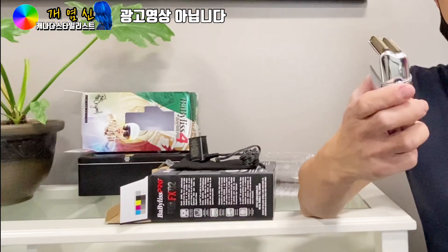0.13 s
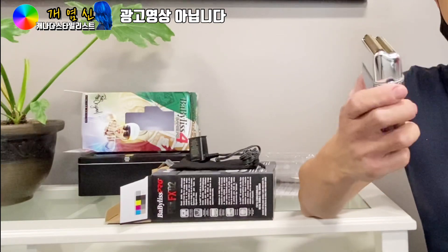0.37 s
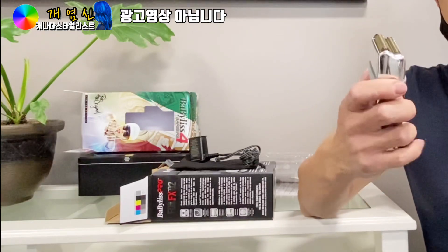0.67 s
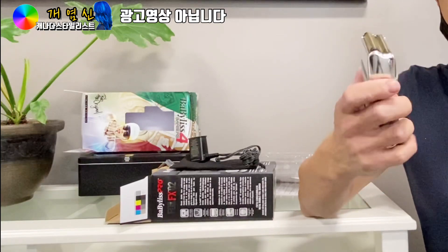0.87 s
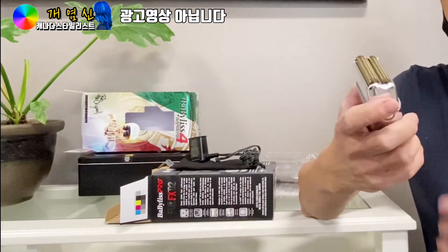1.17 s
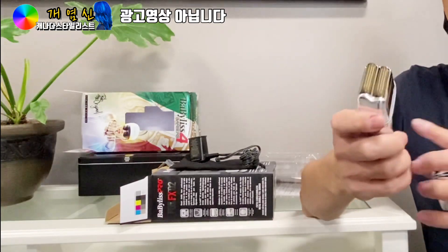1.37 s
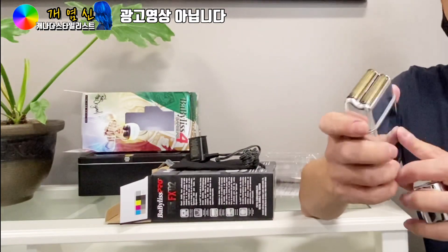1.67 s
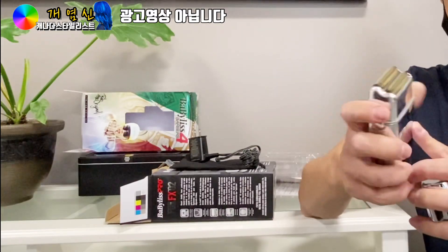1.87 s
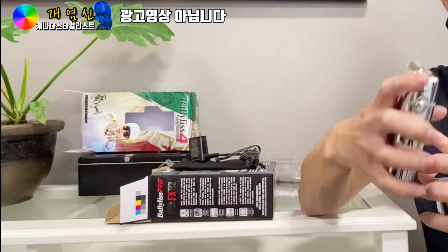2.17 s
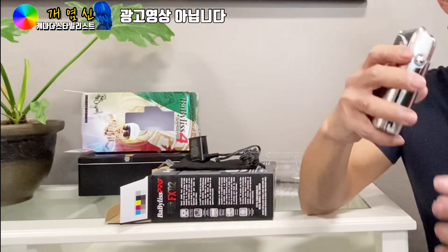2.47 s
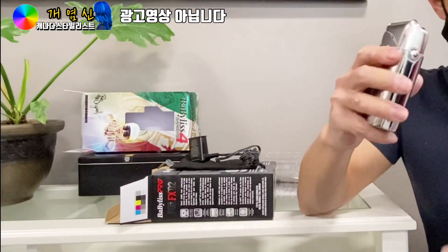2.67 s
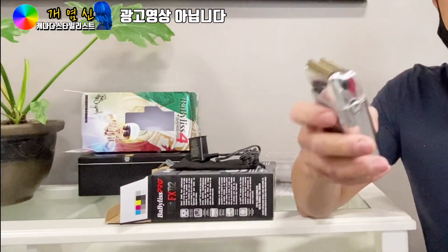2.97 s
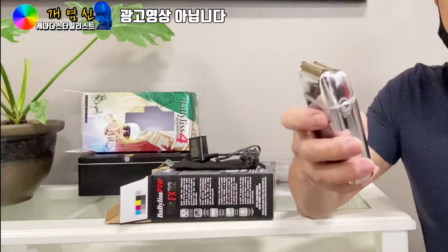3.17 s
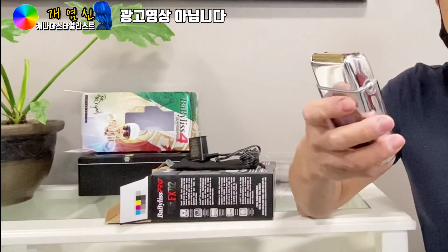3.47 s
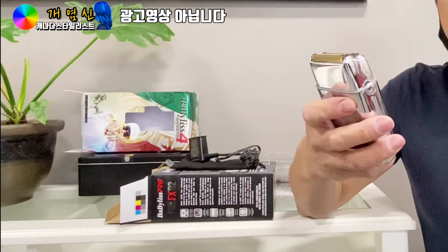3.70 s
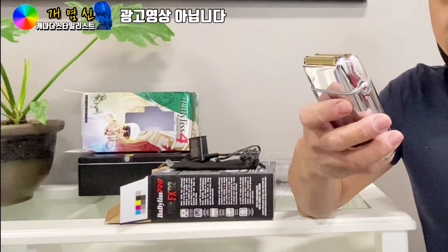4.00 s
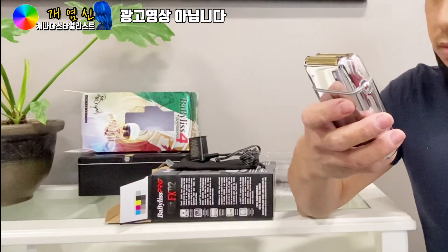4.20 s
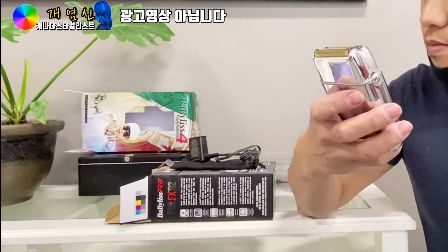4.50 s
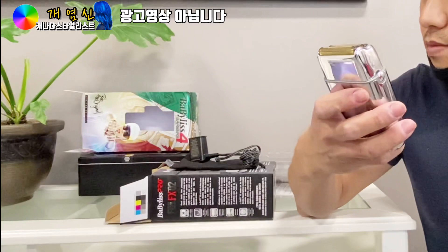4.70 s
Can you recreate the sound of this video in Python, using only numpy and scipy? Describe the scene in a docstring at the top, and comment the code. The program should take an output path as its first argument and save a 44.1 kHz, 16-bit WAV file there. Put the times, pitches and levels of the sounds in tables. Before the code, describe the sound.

The tail of a shaver's buzz slides down and ends right away. A near-silent pause of over a second follows, with faint handling ticks, one medium click, light cloth rustle and a sharp crisp click. The motor switches on with a quick rising rasp, then holds a steady, nasal buzz until the end. Close, clean pickup indoors, with a short soft room tail and low background rumble.

```python
"""Cordless foil shaver in a quiet room

A motor runs down and falls silent. The case gives two clear clicks among fainter ones, then the
motor spins up and buzzes evenly while the hand turns it. The buzz sums the multiples of the turn rate,
shaped by shell resonances, with a pulsing noise rasp. Clicks are noise crackles ringing the case modes.
Noise rumble, mains hum, air and sleeve rustle lie below; decaying noise makes the room."""
import sys
import numpy as np
from scipy import signal
from scipy.fft import rfft, irfft
from scipy.io import wavfile
from scipy.ndimage import uniform_filter1d

SR = 44100
rng = np.random.default_rng(int(sys.argv[2]) if len(sys.argv) > 2 else 0)


def digitize_waveform(pressure):
    """Quantize a signal to 16-bit integers and store it at the path in sys.argv[1].

    Rows of a 2-D input are taken as channels; values are limited to [-1, 1].
    """
    field = np.atleast_2d(pressure).T
    bounded = np.clip(field, -1, 1)
    quanta = np.round(bounded * 32767).astype(np.int16)
    wavfile.write(sys.argv[1], SR, quanta)


N = 213752  # samples
STEP = 128  # samples between points of the slow controls
CUTOFF_HZ = 16000

# Motor switched on. Each row: time in seconds, full speed in turns per second, buzz level in dB at full speed.
RUNNING = [(1.562, 137.4, -36.5), (1.8, 137.0, -33), (1.97, 136.7, -32), (2.08, 135.9, -34),
           (2.47, 136.2, -34.5), (3.44, 136.5, -34.5), (4.07, 135.8, -34), (4.85, 135.5, -33.5)]
FULL_SPEED_HZ = 136
LOUDNESS_POWER = 1.37  # gain goes as speed to this power
# The speed lags at switch-on, then the lag closes.
SPIN_UP_LAG_HZ, SPIN_UP_S, SPIN_UP_SHAPE, ENGAGE_S = 48.6, 0.053, 1.45, 0.014
# Switched off, friction slows the free motor evenly; STOP_S is where its sound ends.
COAST_HZ, BRAKING_HZ_PER_S, COAST_DB, STOP_S = 134.2, 1100, -33, 0.078
COAST_POSE = 0.37  # 0 facing, 1 aside
COAST_DULL_DB = 9  # per octave about 1500 Hz, at standstill: slow knocks are soft

# Cutter reversals and bounces within a turn. Each row: moment as a share of a turn, level in dB.
KNOCKS = [(0.048, -6), (0.332, -7), (.52, -6), (.83, -4.5)]
KNOCK_LENGTH = 0.12  # decay, as a share of a turn
KNOCK_SPREAD, KNOCK_SPREAD_HZ = 0.029, 110  # no two knocks are equally hard: share, and bandwidth

# Turns of the hand from hold to hold (facing, aside, away).
# Each row: middle in seconds, length in seconds, treble flash in dB as the foil sweeps past.
TURNS = [(2.137, 0.4, 3), (2.722, 0.15, -0.5)]
# Shell and foil resonances in the buzz.
# Each row: centre in Hz, width in Hz, then relative level in dB facing, aside and away.
SHELL = [(527, 140, -20.5, -12, -22), (685, 170, -19, -4.5, -10), (803, 120, -21, -4.5, -8),
         (931, 104, -12.5, -29, -13.5), (1080, 130, -10, -8.5, -38), (1236, 77, -2.5, -1, -4.5),
         (1434, 220, -13.5, -5.5, -14.5), (1620, 120, -9, -4, -24), (1820, 123, 5, 0.5, -1),
         (1985, 155, 1.5, 2.5, 3.5), (2213, 45, 2, 3, -62), (2384, 132, -4.5, 3, -5.5),
         (2707, 56, -8.5, 1.5, -11.5), (3030, 110, -9, -13, -24), (3430, 450, -19, -20, -15.5),
         (4120, 900, -7.5, -11, -14.5), (5140, 520, -22, -14, -21.5), (5970, 290, -29, -4, -8),
         (6900, 1130, -14.5, -5, -18), (8430, 4400, -10, -8, -18.5)]
SHELL_FLOOR_DB, LOW_CUT_HZ = -28, 420
# Colour of the upper multiples. Each row: frequency in Hz, relative level in dB.
TREBLE = [(9100, -19.5), (10000, -20.5), (10800, -23.5), (12000, -21.5), (13000, -27.5), (14000, -31.5),
          (15500, -24)]
# Lift of that treble in dB: facing, aside, away.
TREBLE_LIFT_DB = [4, 6.5, 0]
# Both strokes of a turn sound alike, so odd upper multiples are weaker. Cut in dB: facing, aside, away.
ODD_DB = [-7, -3, -3]

# Reflections off hand and table add to or cancel the upper multiples, with a fresh draw for each hold.
SCATTER_SHARE, SCATTER_FROM_HZ, SCATTER_FULL_HZ = 0.24, 2600, 3600
PATCH_SHARE, PATCH_RATE = 0.33, 3.9  # drift in patches of neighbouring multiples: share, rate in Hz
# Level wander in dB at STEADY_BELOW_HZ, smaller below: while held, and added in a turn.
UNSTEADY_DB, TURNING_DB, STEADY_BELOW_HZ = 1.09, 0.83, 4000
WAVER_RATE, TREMOR_RATE = 4.4, 25  # slow and fast wander, Hz
TREMOR_SHARE, SPEED_JITTER = 0.53, 0.000996  # fast wander against the slow; share of the speed

# Colour of the cutters' rasp. Each row: frequency in Hz, relative density in dB per Hz.
RASP = [(400, -73), (700, -17.5), (1000, -7), (1250, -13), (1600, -8.5), (2000, -8), (2700, -11.5),
        (4200, -10), (5400, -15.5), (7000, -8), (12000, -17), (15800, -24)]
RASP_PULSING = 0.44
RASP_DB, RASP_TURNING_DB, COAST_RASP_DB = -22, 5, -6.5  # against buzz: at speed, added in a turn, coasting
START_RASP_DB, START_RASP_S = 10, 0.14  # added while the cutters rattle loosely, until the motor settles

# Clicks of the case. Each row: start in seconds, peak level in dB, brightness in dB per 5 kHz.
CLICKS = [(0.304, -53, -14), (0.5517, -29.5, 1), (0.789, -54, -12), (.904, -55, -3), (1.3688, -21, 9.5),
          (1.3734, -33.5, 2), (1.5633, -35.5, -10)]
# Ringing modes of the case. Each row: frequency in Hz, level in dB before brightness, 60 dB decay in seconds.
CASE = [(1230, -17.5, 0.0076), (2150, -2.5, 0.0067), (3510, -13, 0.0062), (4200, -8, 0.0054),
        (6160, -16, 0.0014), (7200, -3, 0.0023), (8740, -1.5, 0.0018), (9900, -12, 0.0018)]
CLICK_LENGTH_S, CLICK_LOW_HZ = 0.0012, 1000  # crackle decay; low cut
CRACK_DB = 7  # bare contact against the ringing, before brightness

ROOM_T60_S, ROOM_DB, ROOM_BUILD_S = 0.44, -6.5, 0.0054
CLICK_ROOM_DB, BUZZ_ROOM_DB = -2, -5  # sends into the room
# Colour of the room tail. Each row: frequency in Hz, relative level in dB.
ROOM_COLOUR = [(300, 13.5), (1000, 1), (2500, 1.5), (5000, 4), (10000, -7), (16000, 0)]

# Colour of the ventilation rumble. Each row: frequency in Hz, relative density in dB per Hz.
RUMBLE = [(0.88, -54), (1.5, 8.5), (16, 0.5), (38, -20), (70, -5), (81, -23), (98, -25), (132, -22.5),
          (173, -33), (205, -32.5), (232, -30.5), (296, -33), (397, -30.5), (438, -46), (520, -45),
          (680, -97), (1140, -120)]
RUMBLE_DB = -35
# Steady mains hum. Each row: frequency in Hz, rms level in dB.
MAINS = [(62, -52), (120, -66), (240, -63.5), (360, -68.5), (480, -69.5)]
# Colour of the room air. Each row: frequency in Hz, relative density in dB per Hz.
AIR = [(260, -17), (450, 5), (653, -3), (683, 1), (948, -6.5), (1150, -3.5), (1240, -4), (1880, -18.5),
       (9820, -28), (15800, -30)]
# Level of the room air. Each row: time in seconds, rms level in dB.
AIR_LEVEL = [(0, -67), (.3, -63), (.5, -60.5), (.75, -61), (1, -67.5), (1.3, -59.5), (1.55, -60),
             (4.85, -64)]
# Sleeve brushing as the arm moves. Each row: middle in seconds, half length in seconds, level in dB at the middle.
RUSTLE = [(0.61, 0.057, -71), (0.902, 0.14, -73), (1.154, 0.13, -66.5), (1.34, 0.015, -66)]
# Colour of the sleeve. Each row: frequency in Hz, relative density in dB per Hz.
RUSTLE_COLOUR = [(2500, -7), (4500, -11), (8500, -6.5), (11500, -9.5), (14000, -30)]


def running():
    """Switched on, the motor climbs to speed and holds it."""
    s, hz, level_db = np.transpose(RUNNING)
    t = np.arange(int(s[0] * SR), N) / SR
    age = t - t[0]
    speed = np.interp(t, s, hz) - SPIN_UP_LAG_HZ * np.exp(-(age / SPIN_UP_S) ** SPIN_UP_SHAPE)
    gain = amp(np.interp(t, s, level_db)) * np.minimum(age / ENGAGE_S, 1)
    rasp_db = RASP_DB + START_RASP_DB * np.exp(-(age / START_RASP_S) ** 2)
    return motor(t, speed, gain, rasp_db, count=180)


def coasting():
    """Switched off, the motor loses speed evenly, then its sound ends."""
    t = np.arange(int(STOP_S * SR)) / SR
    speed = np.maximum(COAST_HZ - BRAKING_HZ_PER_S * t, 10)
    return motor(t, speed, amp(COAST_DB), COAST_RASP_DB, count=300, pose=COAST_POSE, dull_db=COAST_DULL_DB)


def motor(t, speed, gain, rasp_db, count, pose=0, dull_db=0):
    """Each turn repeats the same knocks of the cutters: multiples of the turn rate, plus a pulsing rasp."""
    coarse = t[::STEP]
    frames = len(coarse)
    slow = np.clip(speed / FULL_SPEED_HZ, 0, 1)
    speed = speed * (1 + SPEED_JITTER * np.interp(t, coarse, waver(TREMOR_RATE, 1, frames)[0]))
    angle = 2 * np.pi * np.cumsum(speed) / SR
    turned, turning, flash_db = hand(coarse)
    hz = np.arange(1, count + 1)[:, None] * speed[::STEP]
    gains = colour(hz, pose + turned) * amp(-dull_db * (1 - slow[::STEP]) * np.log2(hz / 1500))
    # short waves feel small moves of the hand most
    depth_db = (UNSTEADY_DB + TURNING_DB * turning) * np.minimum(hz / STEADY_BELOW_HZ, 1.6)
    wander = waver(WAVER_RATE, count, frames) + TREMOR_SHARE * waver(TREMOR_RATE, count, frames)
    gains = gains * amp(depth_db * wander)
    # averaging neighbours makes patches; the root restores their spread
    patches = [uniform_filter1d(waver(PATCH_RATE, count, frames), size=2, axis=0) * np.sqrt(2)
               for _ in range(2)]
    gains = gains * interfere(PATCH_SHARE * upper(hz), *patches) * amp(flash_db * upper(hz))
    starts = knock_phases(count)
    buzz = sum(np.interp(t, coarse, gains[k]) * np.cos((k + 1) * angle + starts[k]) for k in range(count))
    spread_colour = [(KNOCK_SPREAD_HZ, 0), (2 * KNOCK_SPREAD_HZ, -20), (SR, -80)]
    buzz = buzz * (1 + KNOCK_SPREAD * noise(spread_colour, len(t)))
    # the cutters scrape the foil hardest in mid stroke, twice a turn
    pulsing = 1 + RASP_PULSING * np.cos(2 * angle)
    rasp = amp(rasp_db + RASP_TURNING_DB * hand(t)[1]) * noise(RASP, len(t)) * pulsing
    out, first = np.zeros(N), round(t[0] * SR)
    out[first:first + len(t)] = gain * slow ** LOUDNESS_POWER * (buzz + rasp)
    return out


def knock_phases(count):
    """Partials line up as in one turn's pattern of short noisy knocks."""
    turn = np.arange(2048) / 2048
    bursts = sum(amp(d) * np.exp(-((turn - share) % 1) / KNOCK_LENGTH) for share, d in KNOCKS)
    return np.angle(rfft(bursts * rng.standard_normal(len(turn))))[1:count + 1]


def hand(s):
    """Pose (0 facing, 1 aside, 2 away), how far the hand is inside a turn, and the treble flash in dB."""
    done = np.array([np.clip((s - mid) / length + .5, 0, 1) for mid, length, _ in TURNS])
    inside = np.sin(np.pi * done)
    return done.sum(axis=0), inside.sum(axis=0), np.transpose(TURNS)[2] @ inside


def colour(hz, pose):
    """Partial gains: shell resonances stay put in Hz and blend between holds; rms 1 before reflections."""
    plain, out = 0, 0
    top_hz, top_db = np.transpose(TREBLE)
    odd = np.arange(1, len(hz) + 1)[:, None] % 2
    top = np.clip((hz - top_hz[0]) / 1000 + .5, 0, 1)  # crossfade from resonances to treble
    for k in range(3):
        power = amp(2 * SHELL_FLOOR_DB) + sum(amp(2 * db[k]) / (1 + (2 * (hz - mid) / width) ** 2) ** 2
                                              for mid, width, *db in SHELL)
        treble = amp(np.interp(hz, top_hz, top_db) + TREBLE_LIFT_DB[k])
        gain = (1 - top) * np.sqrt(power) + top * treble
        gain = gain * amp(upper(hz) * ODD_DB[k] * odd) / (1 + (LOW_CUT_HZ / hz) ** 4)
        gain = gain * np.clip(1 - abs(pose - k), 0, 1)  # share of this hold
        scatter = [np.interp(hz / FULL_SPEED_HZ, np.arange(130), draw) for draw in rng.standard_normal((2, 130))]
        plain = plain + gain
        out = out + gain * interfere(upper(hz) * SCATTER_SHARE, *scatter)
    return out * (hz < CUTOFF_HZ) / np.sqrt(np.sum(plain ** 2, axis=0) / 2)


def upper(hz):
    """0 for the long waves that bend round the hand, 1 for the short ones that bounce off it."""
    return np.clip((hz - SCATTER_FROM_HZ) / (SCATTER_FULL_HZ - SCATTER_FROM_HZ), 0, 1)


def interfere(share, cosine, sine):
    """Direct sound plus a reflection of chance phase and strength: dips and peaks, mean power 1."""
    return np.hypot(1 + share * cosine, share * sine) / np.sqrt(1 + 2 * share ** 2)


def clicks():
    """Each click is a short crackle of contacts ringing the case modes; dull ones favour the low modes."""
    size = 900
    out, t = np.zeros(N + size), np.arange(size) / SR
    small_body = signal.butter(2, CLICK_LOW_HZ, "high", fs=SR, output="sos")  # too small to radiate bass
    for s, peak_db, bright_db in CLICKS:
        crackle = rng.standard_normal(size) * np.exp(-t / CLICK_LENGTH_S)
        modes = sum(amp(d + bright_db * hz / 5000 - 60 * t / t60) * np.sin(2 * np.pi * hz * t)
                    for hz, d, t60 in CASE)
        ringing = np.convolve(crackle, modes)[:size]
        hit = signal.sosfilt(small_body, ringing + amp(CRACK_DB + bright_db) * crackle)
        first = round(s * SR)
        out[first:first + size] += amp(peak_db) * hit / abs(hit).max()
    return out[:N]


def room(x):
    """Diffuse tail: coloured noise that builds up as the walls answer, then dies."""
    t = np.arange(SR) / SR
    tail = noise(ROOM_COLOUR, SR) * amp(-60 * t / ROOM_T60_S) * (1 - np.exp(-t / ROOM_BUILD_S))
    return amp(ROOM_DB) * signal.fftconvolve(x, tail / np.sqrt(np.sum(tail ** 2)))[:N]


def background():
    """Coloured noises for ventilation, room air and a brushing sleeve, and steady sines for mains hum."""
    t = np.arange(N) / SR
    rumble = amp(RUMBLE_DB) * noise(RUMBLE, N)
    hum = sum(np.sqrt(2) * amp(d) * np.sin(2 * np.pi * hz * t + rng.uniform(0, 2 * np.pi)) for hz, d in MAINS)
    air = level(AIR_LEVEL) * noise(AIR, N)
    brushing = sum(amp(d) * np.exp(-((t - s) / half) ** 2) for s, half, d in RUSTLE)
    return rumble + hum + air + brushing * noise(RUSTLE_COLOUR, N)


def amp(db):
    """dB to gain."""
    return 10 ** (np.asarray(db) / 20)


def rms_one(x):
    """Scale to rms 1."""
    return x / np.sqrt(np.mean(x ** 2) + 1e-20)


def noise(spectrum, size):
    """Noise of the given colour, drawn over log frequency, rms 1."""
    hz, level_db = np.transpose(spectrum)
    grid = np.maximum(np.fft.rfftfreq(size, 1 / SR), .1)
    gains = amp(np.interp(np.log(grid), np.log(hz), level_db))
    return rms_one(irfft(rfft(rng.standard_normal(size)) * gains, size))


def level(rows):
    """Gain in time from rows of seconds and dB, all but silent outside them."""
    s, level_db = np.transpose(rows)
    return amp(np.interp(np.arange(N) / SR, s, level_db, left=-140, right=-140))


def waver(rate, count, size):
    """Slow unrelated wanderings, one a row, spread 1: noise through a two-pole low-pass."""
    r = np.exp(-2 * np.pi * rate * STEP / SR)
    drift = signal.lfilter([1], [1, -2 * r, r * r], rng.standard_normal((count, size + 300)))
    return rms_one(drift[:, 300:])  # skip the settling


def scene():
    """The even buzz sends less into the room than the short sounds do."""
    coast, click, buzz = coasting(), clicks(), running()
    sent = coast + amp(CLICK_ROOM_DB) * click + amp(BUZZ_ROOM_DB) * buzz
    return (coast + click + buzz + room(sent) + background())[None]


def record(dry):
    """A steep low-pass cuts the top."""
    return signal.sosfilt(signal.cheby2(12, 70, CUTOFF_HZ, fs=SR, output="sos"), dry)


dry = scene()
out = record(dry)
digitize_waveform(out)
```